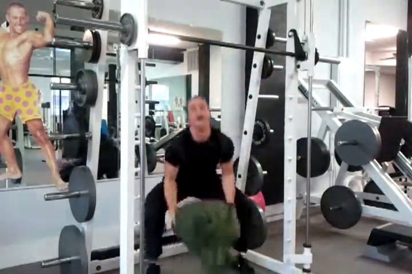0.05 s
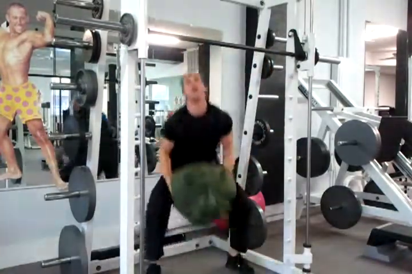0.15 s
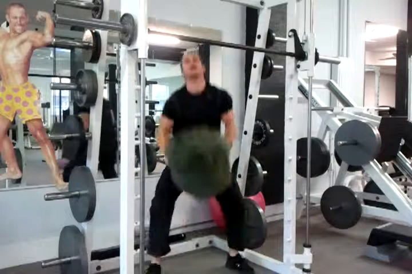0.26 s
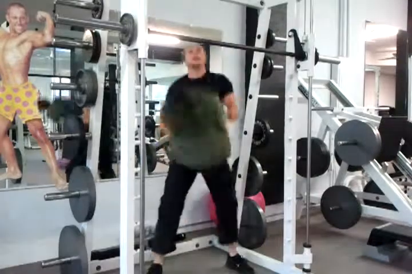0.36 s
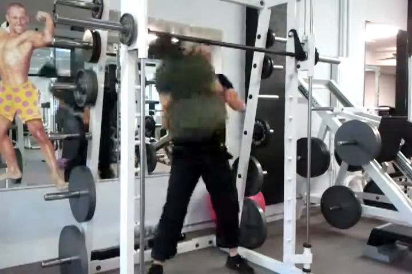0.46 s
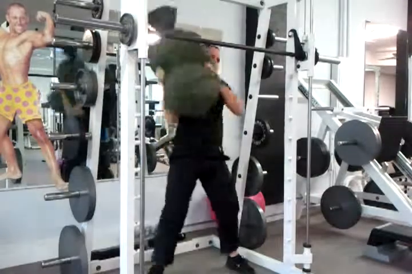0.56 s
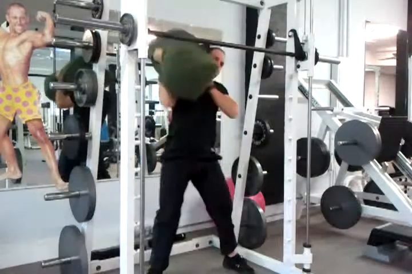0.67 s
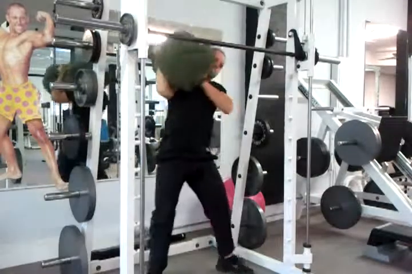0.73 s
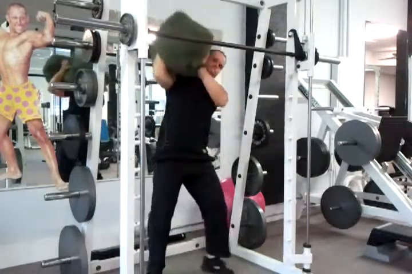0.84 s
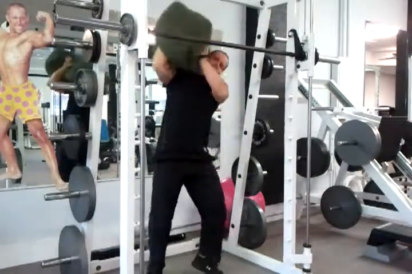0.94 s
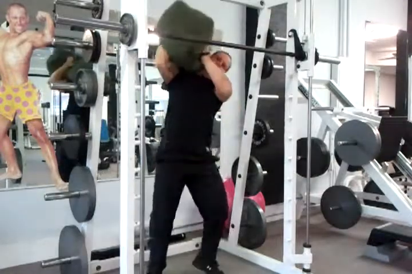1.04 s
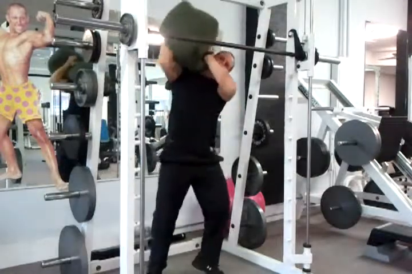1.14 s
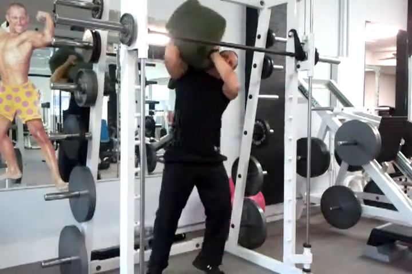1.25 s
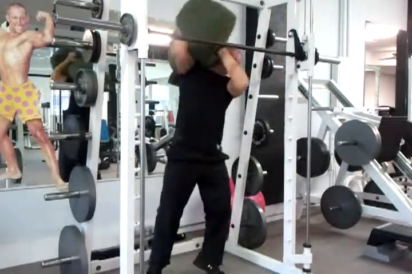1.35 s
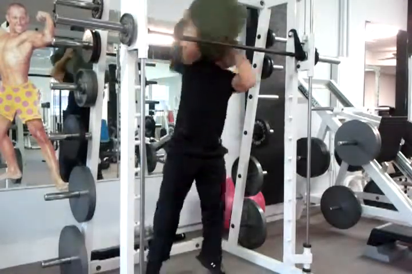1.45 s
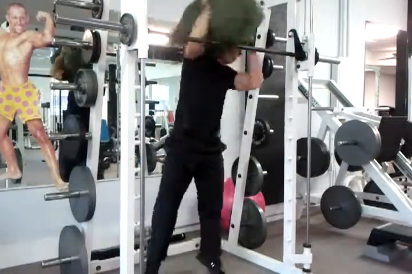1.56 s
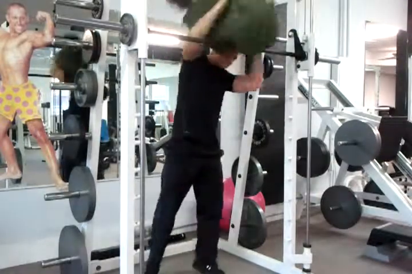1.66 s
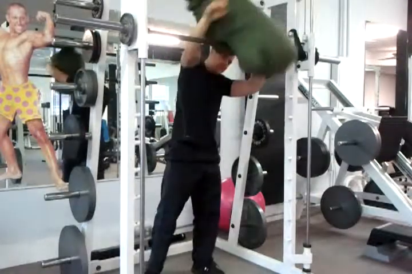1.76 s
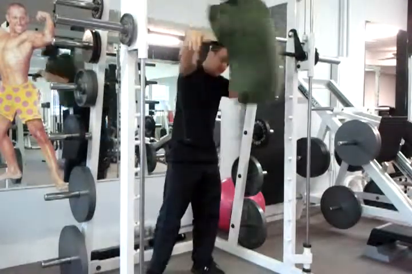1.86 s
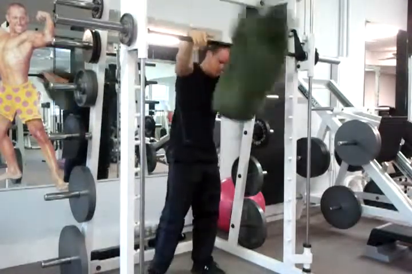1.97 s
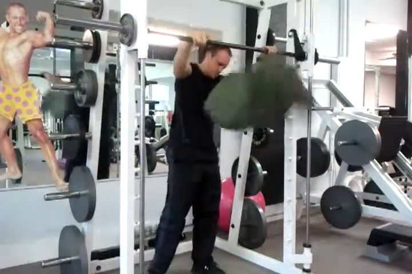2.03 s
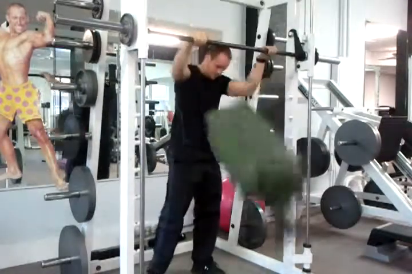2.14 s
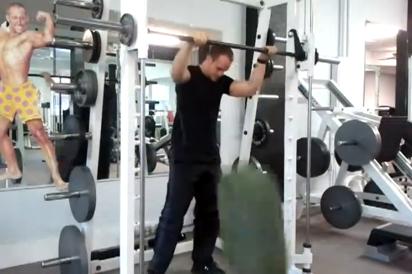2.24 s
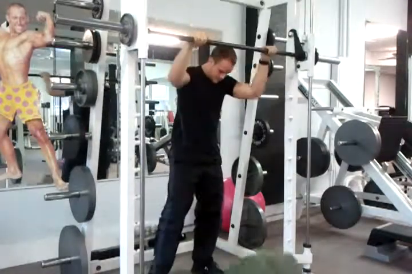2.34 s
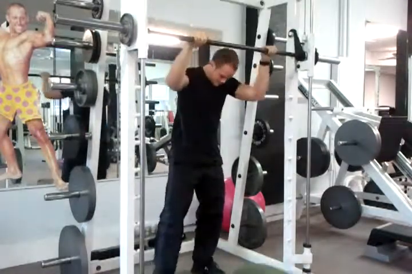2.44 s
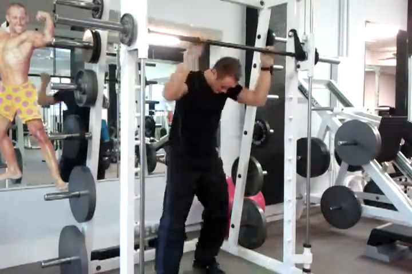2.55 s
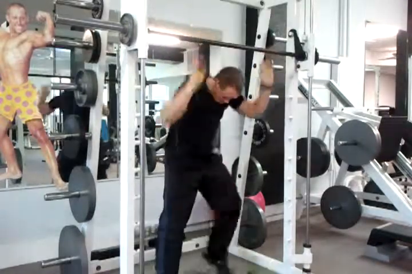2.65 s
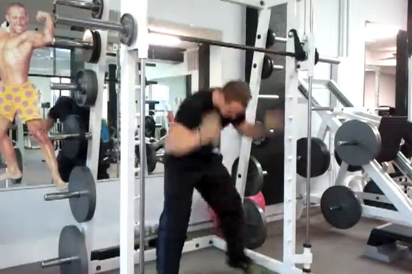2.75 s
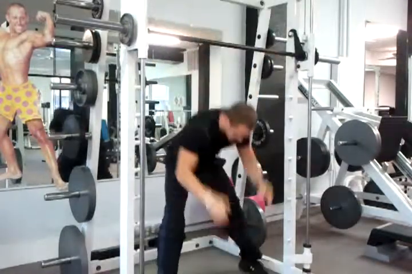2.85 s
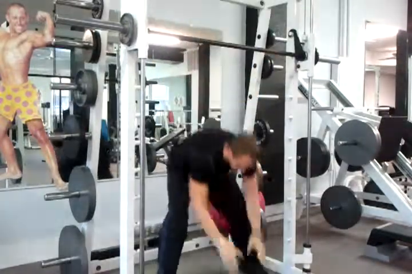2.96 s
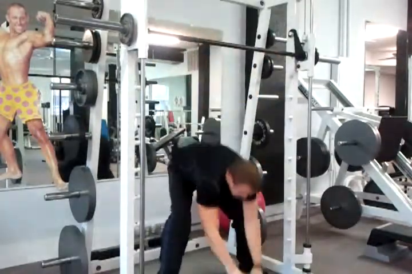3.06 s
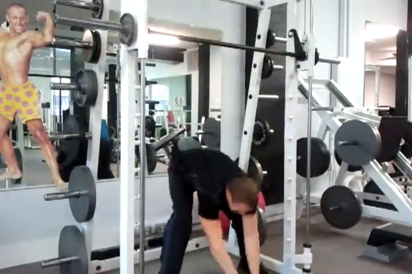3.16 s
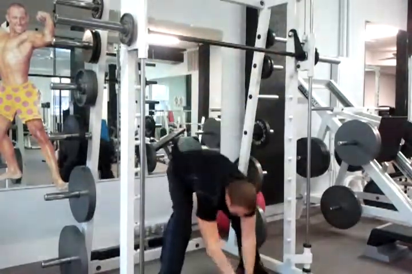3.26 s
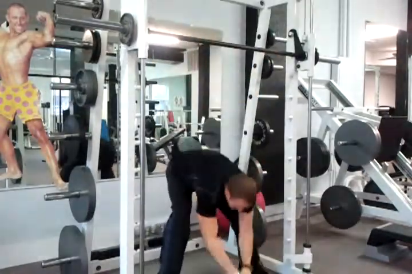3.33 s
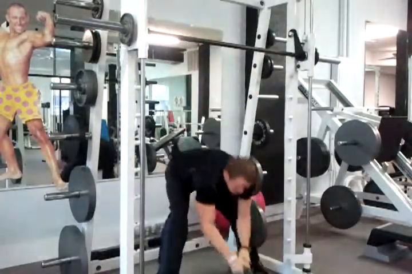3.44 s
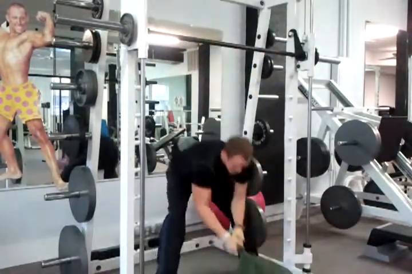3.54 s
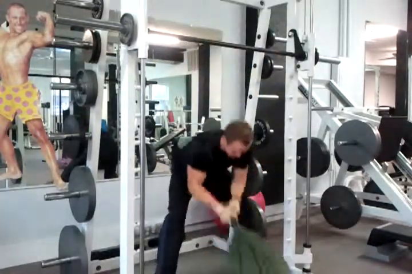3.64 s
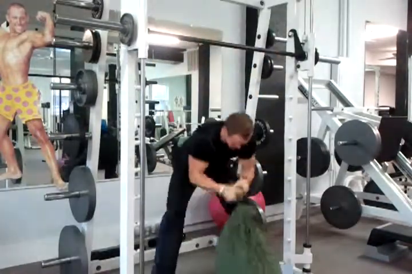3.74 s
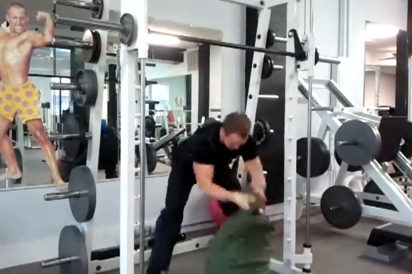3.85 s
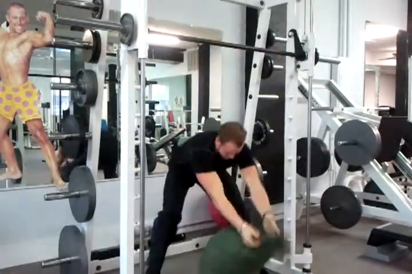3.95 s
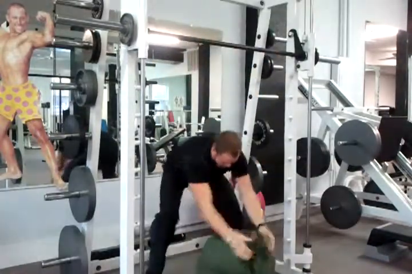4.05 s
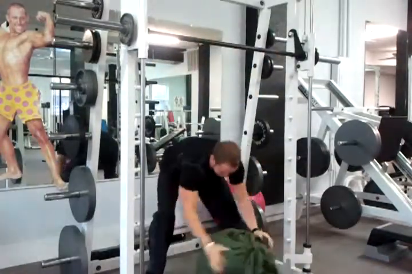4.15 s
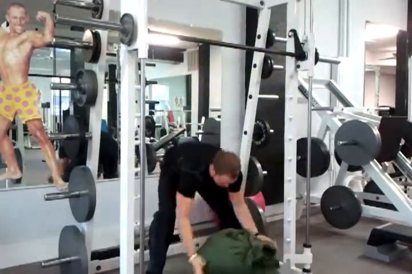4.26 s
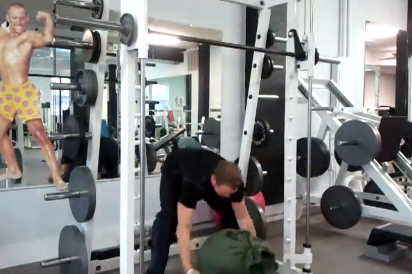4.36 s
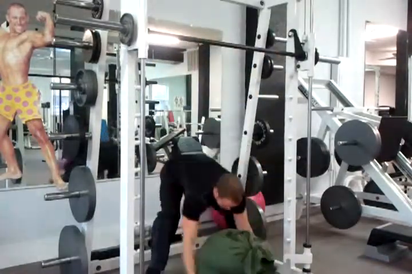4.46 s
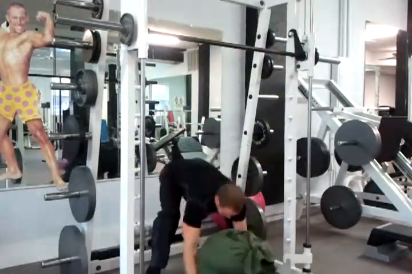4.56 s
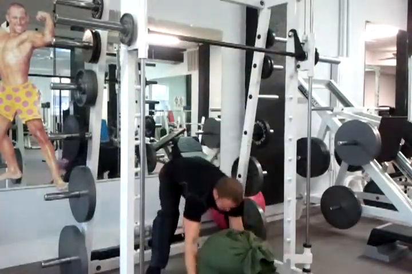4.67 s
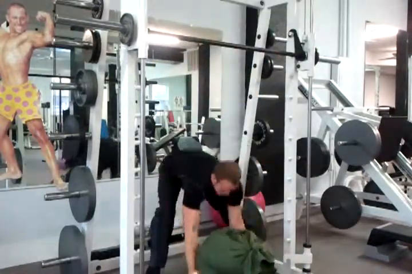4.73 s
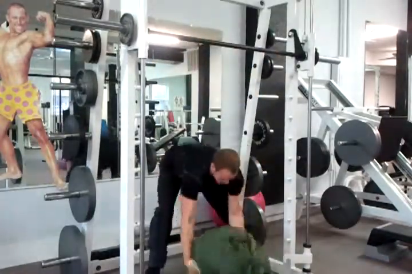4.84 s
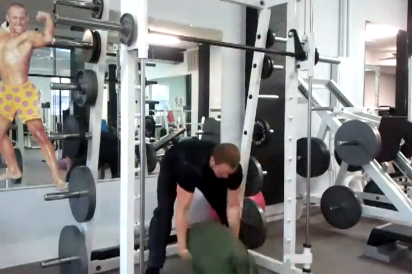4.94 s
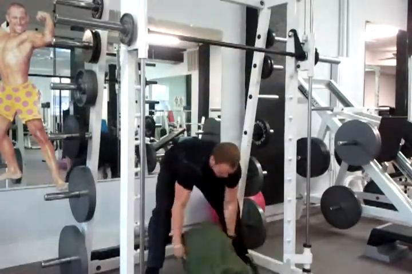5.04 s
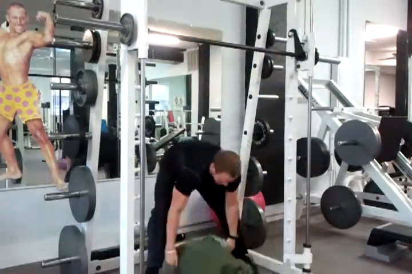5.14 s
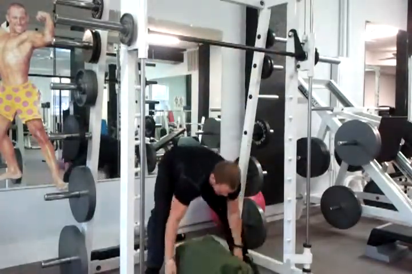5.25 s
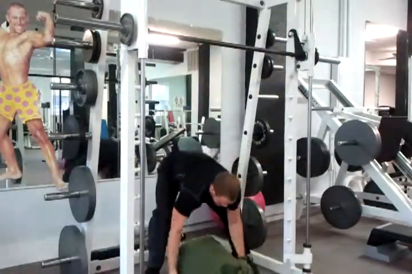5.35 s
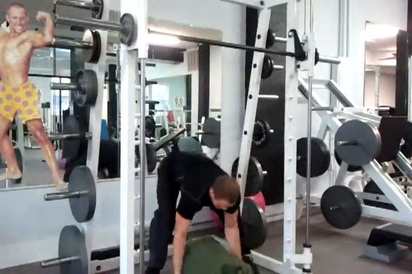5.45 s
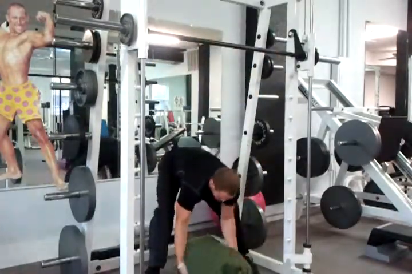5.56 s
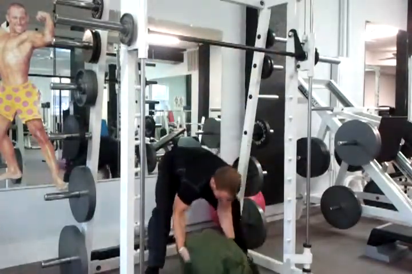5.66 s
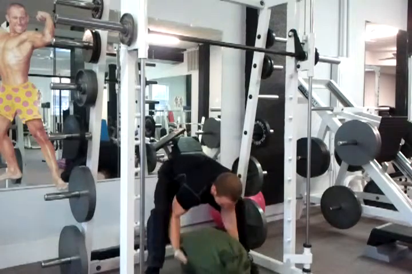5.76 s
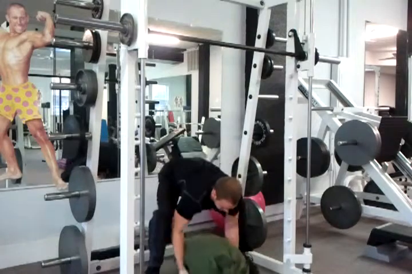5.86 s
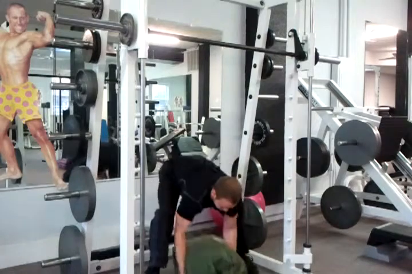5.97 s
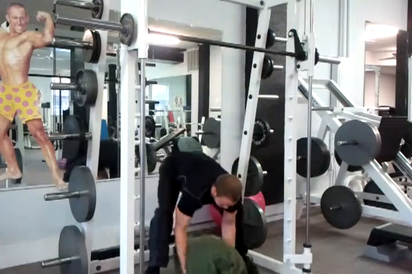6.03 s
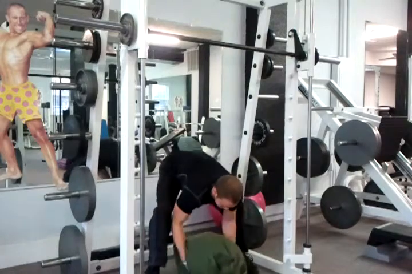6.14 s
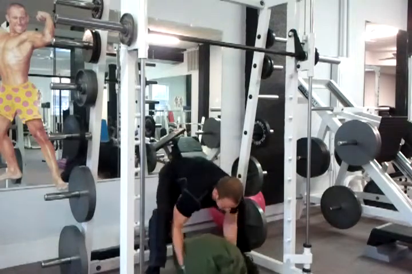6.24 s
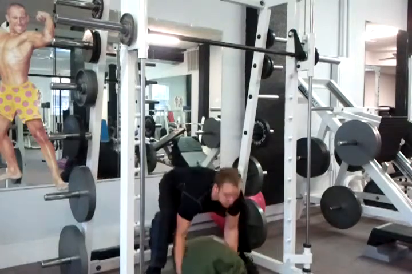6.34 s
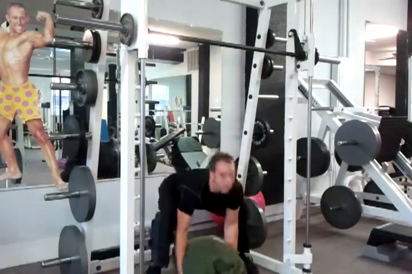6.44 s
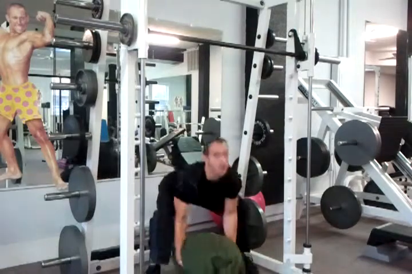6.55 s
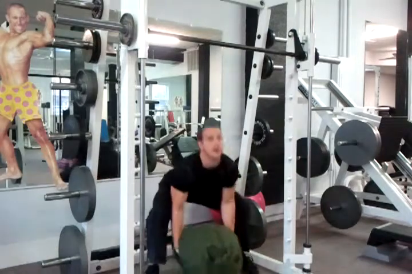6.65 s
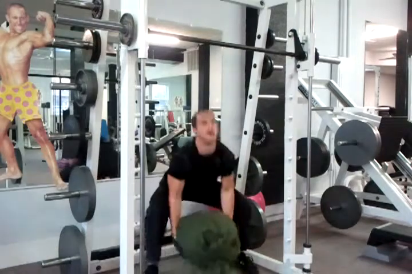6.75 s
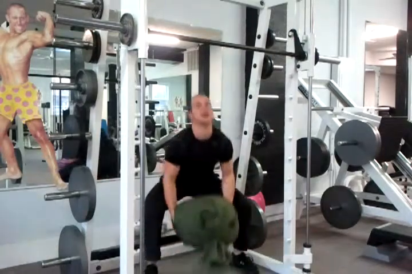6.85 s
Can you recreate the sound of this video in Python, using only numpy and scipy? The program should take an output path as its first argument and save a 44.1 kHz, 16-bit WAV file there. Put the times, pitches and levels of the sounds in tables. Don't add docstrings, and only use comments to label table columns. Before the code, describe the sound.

Soft canvas hiss and gritty floor scuffs open over steady air noise. Just before two seconds a steel bar knocks sharply on its hooks and chimes; about half a second later a sandbag crashes down, booming and crunching, overloading the small mono microphone. The reverberant gym decays within a second. Then the bag is pulled, turned and dropped lightly, with cloth rasping, sand shifting and several muffled bumps.

```python
import sys
import numpy as np
from scipy import signal
from scipy.fft import rfft, irfft
from scipy.io import wavfile

SR = 44100
rng = np.random.default_rng(int(sys.argv[2]) if len(sys.argv) > 2 else 0)


def waveform_to_disk(signal):
    frames = np.transpose(np.atleast_2d(signal))
    scaled = np.clip(frames, -1, 1) * 32767
    samples = np.round(scaled).astype(np.int16)
    wavfile.write(sys.argv[1], SR, samples)


def nominal_scale(level):
    x = np.asarray(level, float) / 20
    return 10 ** x


N = 304289


def rms_one(x):
    return x / np.sqrt(np.mean(x ** 2) + 1e-20)


def at_hz(points, hz):
    points_hz, values = np.array(points).T[:2]
    return np.interp(np.log(hz), np.log(points_hz), values)


def coloured(white, spectrum):
    hz = np.maximum(np.arange(N // 2 + 1) * SR / N, 1)
    return rms_one(irfft(rfft(white) * nominal_scale(at_hz(spectrum, hz)), N))


def drift(rate_hz):
    knots = rng.standard_normal(4000)
    return np.interp(np.arange(N) / SR * rate_hz, np.arange(len(knots)), knots)


def grains(per_s, spread_db, smooth):
    size_db = spread_db * np.minimum(rng.exponential(1, N), 4)
    sizes = nominal_scale(size_db) * rng.choice([-1, 1], N)
    slips = rms_one(sizes * (rng.random(N) < per_s / SR))
    share = np.clip(smooth, 0, 1)
    return np.sqrt(share) * rng.standard_normal(N) + np.sqrt(1 - share) * slips


def ring(clicks, hz, t60_s):
    radius, turn = nominal_scale(-60 / (t60_s * SR)), 2 * np.pi * hz / SR
    poles = [1, -2 * radius * np.cos(turn), radius * radius]
    return signal.lfilter([0, np.sin(turn)], poles, clicks + 1e-18)


# [t/s, level/dB, squash/s, contact cut f/Hz, low push/dB]
BAG_BLOWS = [(1.821, -17, 0.012, 500, -8.5), (1.929, -18, 0.015, 800, -34),
             (2.3973, -10.5, 0.014, 1280, -40), (2.4269, 6, 0.00085, 990, -6),
             (2.436, -0.5, 0.038, 1280, 5.5), (2.478, -5.5, 0.019, 1490, -5),
             (2.631, -21.5, 0.09, 800, -23), (2.734, -24, 0.012, 3000, -18), (2.813, -43, 0.0062, 910, -38),
             (3.668, -33, 0.013, 1200, -42), (4.193, -19.5, 0.01, 1700, -34), (4.76, -43, .008, 900, -26),
             (5.137, -28, 0.0075, 1800, -36), (5.712, -31.5, 0.02, 1200, -54), (5.79, -38, .02, 500, -24),
             (6.088, -17, 0.014, 800, -22), (6.49, -35, .012, 1500, -36)]
# [f/Hz, level/dB, t60/s]
FLOOR_RING = [(156, -55, 0.043), (299.6, 0.5, 0.65), (370, 5, 0.14), (445, -24, 0.17), (683, 9.5, 0.16),
              (859, 8, 0.087), (1205, 7.5, 0.21)]


def bag():
    crush, push = np.zeros(N), np.zeros(N)
    t = np.arange(SR // 4) / SR
    sand = grains(2500, 2.5, smooth=.6)
    heave = coloured(rng.standard_normal(N),
                     [(20, -50.5), (80, -3.5), (170, 4.5), (300, -4.0), (500, -16.5), (2000, -72.0)])
    for start_s, level_db, squash_s, cut_hz, push_db in BAG_BLOWS:
        i = round(start_s * SR)
        span = slice(i, i + len(t))
        fade = np.exp(-t / squash_s)
        dull = signal.butter(1, min(cut_hz, 9000), fs=SR)
        puff = rms_one(signal.lfilter(*dull, sand[span]))
        crush[span] += nominal_scale(level_db) * fade * np.minimum(t / (squash_s / 5), 1) * puff
        push[span] += nominal_scale(push_db) * fade * np.minimum(t / 0.0054, 1) * heave[span]
    boards = sum(nominal_scale(db - 52.5) * ring(crush, hz, t60_s) for hz, db, t60_s in FLOOR_RING)
    return crush + boards, push


# [t/s, level/dB]
BAR_TOUCHES = [
    (1.8105, -21),
    (1.8135, -0.5),
    (1.822, -18.5),
    (1.834, -13),
    (1.853, -26),
    (1.875, -34),
    (1.92, -37),
]
# [f/Hz, level/dB, t60/s]
BAR_AND_HOOK_MODES = [(1846, -3.5, .7), (1886, 3, 0.62), (2028, -10, 0.29), (2060, -5.5, 0.7), (2390, -8, .4),
                      (2703, -9, 0.55), (2860, -28, .3), (2930, -7.5, 0.72), (3370, -18.5, .4), (3805, -16.5, 0.38),
                      (4382, -24, .4), (4914, 0, 0.51),
                      (5125, -18, .3), (5377, -10, .3), (5717, -14, .3), (6097, -4, .3), (6128, -18, 0.32),
              (6163, -19, .4), (6349, -13, .35), (6541, -20, 0.28), (6640, -19, .3), (7120, -9.5, .3),
              (7300, -15, 0.26), (7601, -12.5, .25)]
GRIP_S, GRIP_DB_PER_S = 2.03, 250


def bar():
    touch_s, level_db = np.array(BAR_TOUCHES).T
    at = (touch_s * SR).astype(int)
    modes = BAR_AND_HOOK_MODES
    chance_db = rng.normal(0, 4.2, (len(at), len(modes)))
    chime, crack = np.zeros((2, N))
    wobble = drift(35)
    for k, (hz, db, t60_s) in enumerate(modes):
        clicks = np.zeros(N)
        clicks[at] = nominal_scale(level_db + db + chance_db[:, k] - 13.0) * np.sign(chance_db[:, k - 1])
        beating = nominal_scale(3.9 * np.roll(wobble, 9001 * k))
        chime += ring(clicks, hz, t60_s) * beating
    chime *= nominal_scale(-GRIP_DB_PER_S * np.maximum(np.arange(N) / SR - GRIP_S, 0))
    steel = coloured(rng.standard_normal(N), [(300, -42.5), (1200, -20.0), (2000, 1.5), (4000, -0.5),
                                              (6500, 3.5), (8500, 4.0), (9500, -40.5)])
    t = np.arange(SR // 20) / SR
    for i, db in zip(at, level_db):
        crack[i:i + len(t)] += nominal_scale(db + 5.0) * np.exp(-t / 0.0052) * steel[i:i + len(t)]
    return chime, crack


SWELL_DB = 20


def gestures(rows, fades_db_per_s):
    t = np.arange(0, N, 64) / SR
    power = np.zeros((2, len(t)))
    for start_s, swell_s, hold_s, db, above_db in rows:
        rising_db = SWELL_DB * np.maximum(start_s + swell_s - t, 0) / max(swell_s, .01)
        after_s = np.maximum(t - start_s - swell_s - hold_s, 0)
        power += nominal_scale([[db], [db + above_db]] - rising_db - np.outer(fades_db_per_s, after_s)) ** 2
    return [np.interp(np.arange(N) / SR, t, 10 * np.log10(p + 1e-12)) for p in power]


# [t/s, swell/s, hold/s, scuff level/dB, weight above scuff/dB]
FLOOR_MOVES = [(-.15, 0.18, 0.022, -33, 1.5), (.2, 0.21, 0.13, -39.5, -3), (.45, 0.13, 0.17, -41, 1.5),
               (.5, 0.37, 0.096, -32.5, -5), (.9, 0.18, 0.13, -44, -2.5), (1.2, 0.14, 0.19, -48, 2),
               (1.48, 0.28, .02, -30.5, -11), (1.75, 0.062, .03, -25, -9), (1.83, 0.086, 0.017, -20.5, -13),
               (1.95, 0.13, 0.078, -27.5, -1), (2.2, 0.18, 0.024, -29, -8), (3.0, 0.19, 0.23, -45.5, 0),
               (3.48, 0.15, 0.04, -28, -6.5), (3.6, 0.24, .25, -34, -7), (3.9, 0.29, 0.026, -26.5, -3.5),
               (4.2, 0.096, 0.035, -35, -10), (4.62, 0.29, 0.062, -34, -3.5), (5.08, .07, 0.028, -20.5, -4),
               (5.2, 0.072, 0.046, -30, -3), (5.6, 0.21, 0.057, -29.5, -0.5), (5.95, .15, .002, -28, -3.5),
               (6.38, 0.1, 0.018, -34.5, -1), (6.5, 0.18, 0.097, -35, 0.5),
               (6.1, .15, 0.037, -37, -1),
    (4.35, 0.12, .2, -48, -5),
    (5.57, .035, .003, -43, -6),
]
# [t/s, swell/s, hold/s, hiss level/dB, rasp above hiss/dB]
CANVAS_STROKES = [(-.1, 0.12, .05, -36.5, 0), (0, 0.13, .15, -38, -3.5), (.2, 0.18, 0.085, -33.5, -2.5),
                  (.35, .18, 0.032, -32.5, -2), (.55, 0.15, 0.026, -38.5, 4.5), (.75, 0.095, .04, -35.5, 1),
                  (.7, 0.22, 0.067, -28, -5), (.9, 0.13, .05, -34, -8), (1.0, 0.16, 0.053, -36, -2.5),
                  (1.15, 0.11, 0.064, -38.5, -2), (1.55, 0.17, 0.076, -35, 2), (2.65, 0.081, .01, -28, 3),
                  (2.96, 0.089, 0.051, -33.5, -11), (3.1, 0.083, 0.18, -43, -4.5),
                  (3.5, .23, 0.39, -29.5, 0.5), (4.05, 0.13, .02, -36, 6.5), (4.18, .13, 0.027, -28, 1.5),
                  (4.52, 0.08, 0.11, -40.5, -5.5), (4.7, 0.14, 0.11, -37, 1.5),
                  (5.06, 0.092, 0.026, -29.5, 3), (5.2, 0.067, 0.024, -39.5, 6.5),
                  (5.65, 0.15, 0.19, -39.5, 0.5), (6.0, 0.072, .003, -40, 7), (6.35, 0.11, .04, -42.5, 1.5),
                  (6.5, 0.18, 0.066, -41, 1),
    (6.75, 0.11, .05, -39.5, -5),
    (2.15, 0.089, .06, -46.5, 5.5),
    (6.15, 0.094, 0.043, -48, -2),
    (5.5, 0.11, .08, -49.5, 4),
]
# [f/Hz, level/dB]
SCUFF_SPECTRUM = [(100, -53), (250, -3.5), (450, 0), (800, -0.5), (1200, -4.5), (2000, -12.5),
                  (4000, -27.5), (8000, -56.5)]
WEIGHT_SPECTRUM = [(40, 0.5), (80, -7.5), (150, 2.5), (220, -1.5), (350, -1.5), (700, -35.5)]
RASP_SPECTRUM = [(500, -20), (1200, -2.5), (1800, 0), (3000, -1.5), (4500, -4), (8000, -31.5)]
HISS_SPECTRUM = [(1500, -19), (3500, 0), (5000, 3), (7000, 8), (8500, 10), (9500, -44)]
SCUFF_FADE_DB_PER_S, WEIGHT_FADE_DB_PER_S = 71.5, 74
HISS_FADE_DB_PER_S, RASP_FADE_DB_PER_S = 106.5, 89


def handling():
    scuff_db, weight_db = gestures(FLOOR_MOVES, [SCUFF_FADE_DB_PER_S, WEIGHT_FADE_DB_PER_S])
    hiss_db, rasp_db = gestures(CANVAS_STROKES, [HISS_FADE_DB_PER_S, RASP_FADE_DB_PER_S])
    jerks = drift(25)
    scuff = nominal_scale(scuff_db + 0.5 * jerks + 0.5) * coloured(grains(400, 3.0, smooth=.7), SCUFF_SPECTRUM)
    weight = nominal_scale(weight_db + 1.2 * drift(14) - 1.5) * coloured(rng.standard_normal(N), WEIGHT_SPECTRUM)
    rasp = nominal_scale(rasp_db + 0.6 * jerks - 3.36) * coloured(grains(1500, 4.0, smooth=1.0), RASP_SPECTRUM)
    hiss = nominal_scale(hiss_db + 0.91 * jerks + 0.5) * coloured(grains(3000, 3.2, smooth=0.69), HISS_SPECTRUM)
    return scuff + weight + rasp + hiss


# [start t/s, end t/s, f/Hz, width/Hz, level/dB]
STRAP_SQUEAKS = [
    (.88, 1.14, 6270, 60, -39),
    (1.03, 1.36, 3790, 50, -44.5),
]


def squeaks():
    t, out = np.arange(N) / SR, 0
    for start_s, end_s, hz, width_hz, db in STRAP_SQUEAKS:
        swell = np.sin(np.pi * np.clip((t - start_s) / (end_s - start_s), 0, 1))
        out = out + nominal_scale(db) * swell * rms_one(ring(rng.standard_normal(N), hz, 2.2 / width_hz))
    return out


# [f/Hz, level/dB]
AIR_SPECTRUM = [(30, -7), (100, 5), (175, 2.5), (255, -6), (505, -0.5), (800, -7.5), (2400, -14),
                (5400, -15.5), (8400, -9), (9500, -52)]
# [f/Hz, width/Hz, level/dB]
DUCT_TONES = [
    (196.9, 8.8, -48),
    (523, 16, -56),
    (767, 14, -52),
]
AIR_DB = -36.5


def ventilation():
    air = nominal_scale(AIR_DB - 3.5 + 0.75 * drift(6)) * coloured(rng.standard_normal(N), AIR_SPECTRUM)
    tones = sum(nominal_scale(db) * rms_one(ring(rng.standard_normal(N), hz, 3.4 / width_hz))
                for hz, width_hz, db in DUCT_TONES)
    return air + tones


# [f/Hz, t60/s]
GYM_DECAY = [(60, 0.29), (250, 0.88), (1000, 0.96), (3000, 0.65), (8000, 0.51)]


def gym(x, build_s):
    edges_hz = 40 * 2 ** np.arange(0, 8.1, .5)
    white, out = rng.standard_normal((2, N)), 0
    swell = np.exp(-1 / (build_s * SR))
    for k, (low, high) in enumerate(zip(edges_hz, edges_hz[1:])):
        band = signal.butter(2, [low, high], "band", fs=SR, output="sos")
        keep = nominal_scale(-120 / (SR * at_hz(GYM_DECAY, np.sqrt(low * high))))
        energy = signal.sosfilt(band, x) ** 2 + 1e-18
        poles = np.convolve([1, -keep], [1, -swell])
        stored = signal.lfilter([(1 - keep) * (1 - swell)], poles, energy)
        out = out + np.sqrt(np.abs(stored)) * rms_one(signal.sosfilt(band, white[k % 2]))
    return out


def scene():
    soft, push = bag()
    chime, crack = bar()
    direct = nominal_scale(-2.0) * soft + push + chime + crack
    wet = gym(nominal_scale(2.0) * soft + nominal_scale(-8.5) * push + nominal_scale(6.5) * crack, build_s=0.0015)
    mono = direct + wet + handling() + ventilation() + squeaks()
    return np.array([mono, mono])


def roll_off(x):
    return signal.sosfilt(signal.butter(12, 15800, fs=SR, output="sos"), x)


# [f/Hz, level/dB]
TREBLE_LIMIT = [(7960, 0), (8050, -14), (8200, -80), (8400, -110)]


def record(dry):
    top = 1.28
    x = top * np.tanh(dry / top)
    for cut_hz in (240, 95):
        x = signal.sosfilt(signal.butter(1, cut_hz, "high", fs=SR, output="sos"), x)
    hz = np.arange(1, N // 2 + 2) * SR / N
    x = irfft(rfft(x) * nominal_scale(at_hz(TREBLE_LIMIT, hz)), N)
    mix = np.clip(x, -.99, .99)
    return roll_off(mix)


dry = scene()
out = record(dry)
waveform_to_disk(out)
```